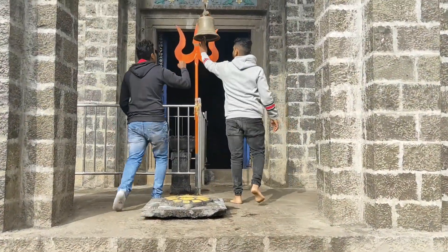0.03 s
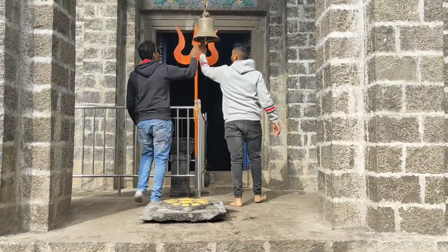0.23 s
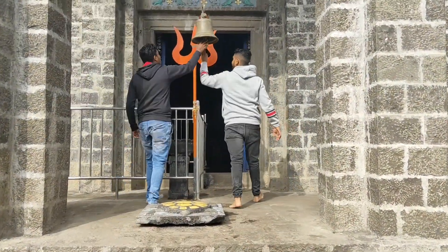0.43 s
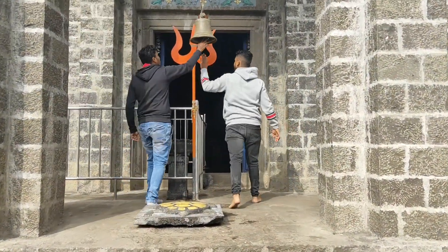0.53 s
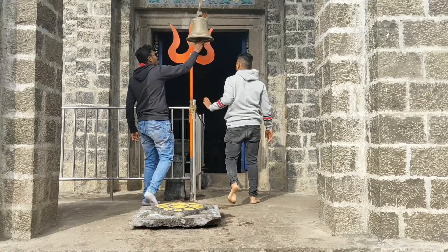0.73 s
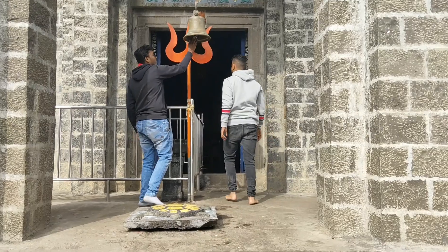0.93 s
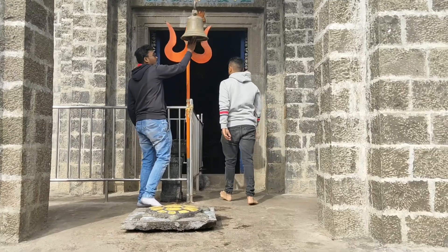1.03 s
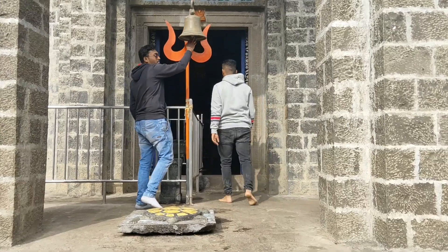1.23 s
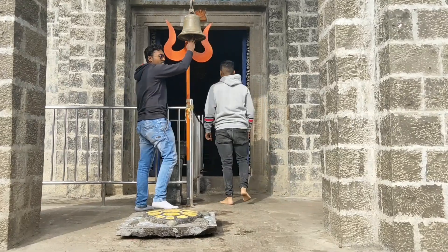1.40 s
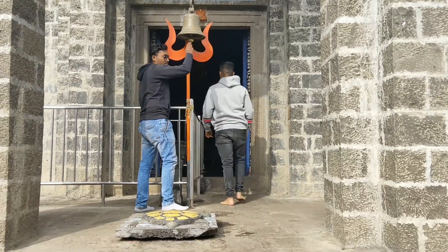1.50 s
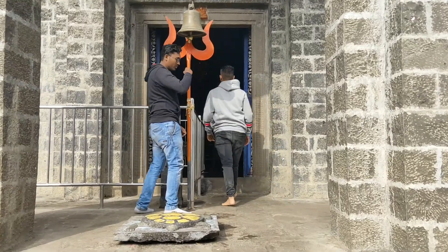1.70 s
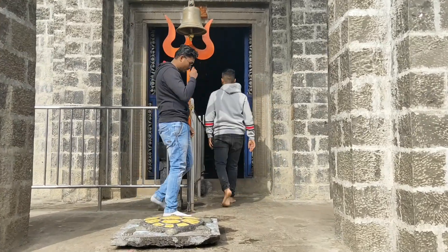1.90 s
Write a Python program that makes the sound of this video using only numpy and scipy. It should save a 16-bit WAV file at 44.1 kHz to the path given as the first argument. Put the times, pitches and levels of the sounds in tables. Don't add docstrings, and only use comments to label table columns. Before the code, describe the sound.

Two clanging blows on a hanging brass bell ring on in a stone doorway; loose metal rattles afterwards.

```python
import sys
import numpy as np
from scipy import signal
from scipy.io import wavfile
from scipy.ndimage import uniform_filter1d, minimum_filter1d

SR = 44100
rng = np.random.default_rng(int(sys.argv[2]) if len(sys.argv) > 2 else 0)


def voltage_ratio(decibels):
    exponent = np.asarray(decibels, float) / 20
    return 10 ** exponent


def digitize_waveform(pressure):
    field = np.atleast_2d(pressure).T
    bounded = np.clip(field, -1, 1)
    quanta = np.round(bounded * 32767).astype(np.int16)
    wavfile.write(sys.argv[1], SR, quanta)


N = 85995

BLOW_S = [
    .2228,
    1.0838,
]
# (frequency [Hz], left-right [dB])
RATTLE_PAN = [(1000, -5.5), (2800, 8.5), (4300, 10), (5500, 12), (6500, -9)]


def rms_one(x):
    return x / np.sqrt(np.mean(x ** 2) + 1e-20)


def in_time(rows):
    s, *columns = np.transpose(rows)
    return [np.interp(np.arange(N) / SR, s, c) for c in columns]


def at_hz(points, hz):
    point_hz, values = np.transpose(points)
    return np.interp(np.log(hz), np.log(point_hz), values)


def drift(rate_per_s):
    r = np.exp(-80 * np.pi * rate_per_s / SR)
    white = rng.standard_normal(N // 40 + 2002)
    slow = signal.lfilter([1], [1, -2 * r, r * r], white)[2000:]
    return np.interp(np.arange(N) / 40, np.arange(len(slow)), rms_one(slow))


def ring(force, hz, t60_s):
    pole = voltage_ratio(-60 / (t60_s * SR)) * np.exp(2j * np.pi * hz / SR)
    return signal.lfilter([1], [1, -pole], force + 1e-18)


def ports(z, lead_rad, pan_db):
    turn = np.exp(.5j * lead_rad)
    return np.array([(z * turn).imag * voltage_ratio(pan_db / 2), (z / turn).imag * voltage_ratio(-pan_db / 2)])


def bands(white, spectrum, shape):
    low_end_hz, high_end_hz = spectrum[0][0], spectrum[-1][0]
    out, edges_hz = 0, 20 * 2 ** np.arange(0, 10, .5)
    for low, high in zip(edges_hz, np.append(edges_hz[1:], 17000)):
        hz = np.sqrt(low * high)
        if low_end_hz * .8 < hz < high_end_hz * 1.1:
            sos = signal.butter(3, [low, high], "band", fs=SR, output="sos")
            out = out + voltage_ratio(at_hz(spectrum, hz)) * shape(hz) * signal.sosfilt(sos, white)
    power = [voltage_ratio(at_hz(spectrum, hz)) ** 2 for hz in np.linspace(low_end_hz, high_end_hz, num=400)]
    return out / np.sqrt(np.mean(power) * high_end_hz * 2 / SR)


def stereo_noise():
    alike = .6
    mid, side = rng.standard_normal((2, N))
    return (np.sqrt(1 + alike) * mid + np.sqrt(1 - alike) * side * [[1], [-1]]) / np.sqrt(2)


def wind():
    # (time [s], level [dB], left-right [dB])
    gust = [(0.0, -73.5, -1), (0.286, -70, 8), (0.396, -23.5, 37), (0.422, -42.5, 10.5), (0.656, -30, 24.5),
            (0.754, -50, 0), (0.988, -46, 10.5), (1.02, -34, -35), (1.074, -51.5, 3), (1.248, -41.5, 12.5),
            (1.682, -48.5, -11.5), (1.818, -40, 13), (1.95, -69, -10)]
    # (frequency [Hz], density [dB per Hz])
    colour = [(12, -57), (20, -30), (87, 5.5), (140, 2.5), (225, -7), (283, -11), (420, -27), (550, -47.5),
              (920, -120)]
    db, pan_db = in_time(gust)
    share = voltage_ratio(np.array([pan_db, -pan_db]) / 2)
    share = share / np.sqrt(np.sum(share ** 2, axis=0))
    lumps = bands(rng.standard_normal((2, N)), colour, lambda hz: voltage_ratio(6.86 * drift(11.5)))
    return lumps * voltage_ratio(db + 2.0) * share


def touch():
    # (frequency [Hz], level [dB], t60 [s])
    modes = [(352, -76, 0.052), (1425, -82, 0.037), (2750, -80, .03), (3300, -102, 0.036),
             (5950, -112, .04)]
    start_s, rise_s, length_s = .138, .014, .06
    since = np.arange(N) / SR - start_s
    envelope = np.clip(since / rise_s, 0, 1) * np.exp(-np.maximum(since, 0) / length_s)
    rub = rng.standard_normal(N) * envelope
    return sum(voltage_ratio(db) * ring(rub, hz, t60_s).imag for hz, db, t60_s in modes)


def partial(hz, levels_db, t60_s, swell_s):
    out = np.zeros((2, N), complex)
    for row, s, db in zip(range(2), BLOW_S, levels_db):
        start = int(s * SR)
        since = np.arange(min(N - start, int(1.5 * t60_s * SR))) / SR
        decaying = np.exp((2j * np.pi * hz - np.log(1000) / t60_s) * since)
        out[row, start:][:len(since)] = voltage_ratio(db) * (1 - np.exp(-since / swell_s)) * decaying
    return out


def named_partials():
    rim_hz = [467.5, 468.97, 1015.79, 1016.28, 1055.79, 1058.61, 1450.31, 1452.02, 1493.64, 1495.23,
              2173.96, 2174.52, 2177.49, 2183.35]
    waist_hz = [2509.76, 2555.31, 2855.1, 2855.27, 2887.34, 2891.36, 3036.29, 3039.22, 3047.02, 3105.5,
                3550.52, 4046.81, 4051.18, 4207.74]
    shoulder_hz = [4208.49, 4253.2, 4524.49, 4537.9, 5194.11, 5194.65, 5198.19, 5407.64, 5830.5, 6232.5,
                   6237.87, 6473.9, 6453.13, 6691.5]
    # (first blow [dB], second blow [dB], t60 [s], left-right
    # [dB], left port's lead [rad])
    partials = [(-35.5, -48.5, 17.3, 0.8, 0.84), (-42.5, -36.5, 27, -1.5, 0.12), (-24, -26.5, 4.34, -13.5, 6.5),
                (-19, -50, 1.82, -7, 0.36), (-34.5, -31.5, 5.2, -5, 0.8), (-19, -29.5, 5.98, -5.5, -6),
                (-21, -31.5, 2.64, 1.5, -3.5), (-30.5, -18.5, 1.72, 13, 3.5), (-31.5, -25, 1.94, 6, 3.5),
                (-26, -29.5, 4.3, -10, -3), (-19, -21.5, 2.1, 4.5, 1.32), (-18.5, -36.21, 1.28, -17.5, -2.5),
                (-17, -17.5, 0.88, 4.5, 6), (-72.5, -18.05, 0.82, -3, 6),
                (-29, -29, 0.64, 8, -0.4), (-45.5, -32.5, 1, 0.5, 5.5), (-6, -12, 0.15, 5, 4.5),
             (-11, -20.5, 0.6, 3.5, -2.2), (-36.5, -34, 1.7, 9, 3.5), (-22.5, -22, 0.53, 15.5, 0.3),
             (-16, -42.5, 1.14, 7.5, -2.5), (-16, -16.5, 0.72, 17.5, -0.13), (-16.5, -54.5, 0.45, -2, 3),
             (-30, -35.5, 1.04, 5, 6.5), (-38.5, -43.5, 0.77, 1, 1), (-28.5, -34.05, 0.72, 7, 1.1),
             (-39, -30, 0.48, 3.5, 3.5), (-25, -30.5, 0.58, 4.5, -1.5),
                (-24.52, -37, 0.17, 13.5, -6), (-35.5, -46, 0.94, 6, 2.04), (-42, -60, 0.95, -16.5, -5),
                (-29, -42.5, 0.72, -1, 2), (-9.5, -14, 0.42, -10, 2), (-5.5, -10.5, 0.29, -5, -4.5),
                (-19.5, -28, 0.53, -2.31, 1.5), (-37, -38.5, 0.49, -2, -3.5), (-29.5, -31.5, 0.38, -6, 0.1),
                (-24, -32.5, 0.5, -5, -1.3), (-37, -39.5, 0.73, -23, -2), (-36.5, -26.5, 0.43, 24.0, 4),
                (-19, -28, 0.55, -5, -0.1), (-32.5, -45, 0.95, 7.5, 3.4)]
    rim_turned = [23.5, -2, -9, -20.5, -1, -6, -5, -9.19, -15, -13, 1.5, 12, 7.5, 4]
    waist_turned = [0, 3.1, 4, 3.5, 11, 5.5, 22, 7.5, -1, 18, -3, 4, -9, 12.5]
    shoulder_turned = [4, 2.5, 20, 13.5, -3.5, -2, 8, 0, -4, -9, 12, -2, -5, -2]
    swell_at_1khz_s = .029
    sway_db_per_khz, sway_per_s = .6, 7
    out, sway, below_hz = np.zeros((2, N)), 1, 0
    rows = zip(rim_hz + waist_hz + shoulder_hz, partials,
               rim_turned + waist_turned + shoulder_turned)
    for hz, (first_db, second_db, t60_s, pan_db, lead_rad), turned_db in rows:
        first, second = partial(hz, [first_db, second_db], t60_s, swell_at_1khz_s * 1000 / hz)
        if abs(hz - below_hz) >= 5:
            depth_db = sway_db_per_khz * max(hz - 1500, 0) / 1000
            sway = voltage_ratio([depth_db * drift(sway_per_s) for side in range(2)])
        below_hz = hz
        out += (ports(first, lead_rad, pan_db) + ports(second, lead_rad, turned_db)) * sway
    return out


def flickering(hz, levels_db, cycles):
    flicker = voltage_ratio([5.5 * drift(12) for side in range(2)])
    z = sum(partial(hz, levels_db, cycles / hz, 0.0081))
    return ports(z, rng.uniform(-4.5, 2.7), rng.normal(0, 4.5)) * flicker


def crown():
    crown_hz = [6883, 6969, 7048, 7219, 7350, 7714, 7848, 8163, 8241, 8415, 8930, 9028, 9320, 9777, 10125,
                10541, 10870, 11270, 12342, 12500, 12755, 13170, 13530, 13861, 14168, 14425, 14655]
    # (first blow [dB], second blow [dB])
    levels = [(-45, -54.5), (-39.5, -44.5), (-41, -44.5), (-38, -63), (-49, -59.5), (-41.5, -47),
              (-41, -56.5), (-47, -65), (-51, -69), (-43, -49), (-54, -63), (-44.5, -54), (-44.5, -50.5),
              (-50, -62), (-43.5, -58.5), (-55, -70), (-61, -56.5), (-62, -56.5), (-66, -58.5),
              (-51.5, -69), (-60.5, -65.5), (-62, -64), (-68, -74), (-69.5, -70), (-66, -84), (-64, -79),
              (-66, -79)]
    out = np.zeros((2, N))
    for hz, db in zip(crown_hz, levels):
        lift_db = 6.5 if hz > 11000 else 0
        out += flickering(hz, np.array(db) + lift_db, 4740)
    return out


def weak_partials():
    # (frequency [Hz], level [dB])
    spectrum = [(1500, -53), (2500, 5.5), (3600, -12.5), (5000, -8.5), (6500, 5.5), (8000, -18.5),
                (11000, -17), (15800, -19)]
    level_db, second_db, usual_cycles = -46.5, -9, 4040
    out = np.zeros((2, N))
    for u, a, b in rng.random((70, 3)):
        hz = 2300 + 5200 * u
        db = level_db + at_hz(spectrum, hz) + 10 * a
        cycles = usual_cycles * (.5 + rng.random())
        out += flickering(hz, [db, db + second_db + 12 * (b - .5)], cycles)
    return out


def clank():
    # (frequency [Hz], density [dB per Hz])
    colour = [(150, -11), (700, -9.5), (1500, -1.5), (3000, -4), (4300, -5), (6500, -8.5), (8000, -31.5),
              (15800, -47.5)]
    blow_db = [-22.5, -24.5]
    # (frequency [Hz], t60 [s])
    decay = [(300, .3), (2000, .2), (7000, .2), (9000, .06), (15000, .05)]
    t = np.arange(N) / SR

    def dying(hz):
        t60_s = at_hz(decay, hz)
        return sum(voltage_ratio(db - 60 * (t - s) / t60_s) * (t > s) for s, db in zip(BLOW_S, blow_db))

    return bands(stereo_noise(), colour, dying)


def bell():
    return named_partials() + crown() + weak_partials() + clank()


def scuff():
    # (time [s], level [dB])
    level = [
        (0, -110),
        (.2, -100),
        (.24, -44.5),
        (.6, -56),
        (.85, -59),
        (.98, -47),
        (1.06, -47.5),
        (1.15, -47),
        (1.5, -66.5),
        (1.95, -49),
    ]
    # (frequency [Hz], density [dB per Hz])
    colour = [(300, 6.5), (700, 2), (1800, 4.5), (3000, -2.5), (4500, -8), (6500, -3), (8500, -16),
              (12000, -57.5)]
    level_db, = in_time(level)
    return bands(stereo_noise(), colour, lambda hz: voltage_ratio(level_db + 0.98 * drift(36.0)))


def rattle(on, late_s, knocks):
    # (frequency [Hz], density [dB per Hz])
    colour = [(300, -12.5), (1100, -3), (2000, 3), (3100, 1.5), (4300, 0), (6500, 1.5), (7600, -30),
              (8300, -21.5)]
    dulling_db_per_s = 48

    def shape(hz):
        sides = voltage_ratio(0.27 * at_hz(RATTLE_PAN, hz) * np.array([[1], [-1]]))
        return on * sides * voltage_ratio(-dulling_db_per_s * late_s * hz / 8000)

    return bands(stereo_noise() + 0.5 * rms_one(knocks), colour, shape)


def shaken(on):
    rattled_hz = [1071, 2094, 2558, 3052, 3208, 4048, 5410, 6191, 6578, 7230, 8102, 9130]
    # (level [dB], t60 [s])
    shaken_modes = [(-9.5, 1), (-9.5, .4), (-6.5, 0.69), (-5.5, 0.48), (-4.5, 0.17), (-10.5, 0.3),
                    (-21, 0.34), (-1.5, 0.23), (5, 0.24), (-3, 0.064), (-16.5, 0.047), (-14.5, 0.063),
                    (-5.5, 0.5), (-8, 0.38), (-8, 0.28), (-21.5, 0.2), (-18.5, 0.4), (-7, 0.46),
                   (-5.5, 0.21), (-24, 0.1), (-16, 0.15), (-10, 0.27), (-14, 0.27), (-12, 0.31),
                   (-12, 0.16), (-4, 0.077)]
    more_hz = [1453, 2178, 2198, 2762, 2808, 2858, 2994, 3549, 3912, 4259, 5206, 5710, 5943, 6818]
    lift_db, top_db = 1, -27
    out = np.zeros((2, N))
    for hz, (db, t60_s) in zip(rattled_hz + more_hz, shaken_modes):
        z = ring(on ** 2 / on.max() * rng.standard_normal(N), hz, t60_s)
        level_db = min(db + lift_db, 0) + top_db + 1.73 * drift(31.0)
        out += ports(z, rng.normal(0, 1), at_hz(RATTLE_PAN, hz)) * voltage_ratio(level_db)
    return out


def jingle(on, knocks):
    level_db, db_per_khz, cycles = -45, -3.6, 1100
    shake = on ** 3 / on.max() ** 2 * knocks
    out = np.zeros((2, N))
    for u, a, b in rng.random((36, 3)):
        hz = 7600 + 8000 * u
        z = ring(shake, hz, cycles / hz * (.5 + a))
        db = level_db + db_per_khz * (hz - 7600) / 1000 + 10 * b
        out += ports(z, 3.6 * (a - b), 10 * (b - .5)) * voltage_ratio(db)
    return out


def third_blow():
    # (time [s], level [dB])
    clatter = [
        (1.562, -104),
        (1.582, -30),
        (1.605, -19.5),
        (1.64, -22.5),
        (1.7, -25.5),
        (1.8, -32.5),
        (1.95, -46.5),
    ]
    knocks_per_s = 3100
    level_db, = in_time(clatter)
    late_s = np.maximum(np.arange(N) / SR - clatter[2][0], 0)
    on = voltage_ratio(level_db) * (np.arange(N) > clatter[0][0] * SR)
    hits = rng.random(N) < knocks_per_s / SR
    strength = voltage_ratio(5.9 * np.minimum(rng.exponential(1, N), 5))
    knocks = hits * strength * rng.choice([-1, 1], N)
    return rattle(on, late_s, knocks) + shaken(on) + jingle(on, knocks)


def scene():
    return wind() + touch() + bell() + scuff() + third_blow()


def low_pass(x):
    return signal.sosfilt(signal.butter(12, 15800, fs=SR, output="sos"), x)


def record(dry):
    # (time [s], gain [dB])
    gain = [(.22, 4), (.26, 4), (.33, -0.5), (.7, 0.5), (1.08, -3), (1.1, 6), (1.3, 0), (1.57, 2.5),
            (1.62, -4.5), (1.75, -7), (1.95, -0.5)]
    ceiling_db, release_db_per_s = -2.2, 60
    gain_db, = in_time(gain)
    x = dry * voltage_ratio(gain_db)
    over_db = np.maximum(20 * np.log10(abs(x).max(axis=0) + 1e-9) - ceiling_db, 0)
    ramp_db = release_db_per_s * np.arange(N) / SR
    held_db = -minimum_filter1d(ramp_db - np.maximum.accumulate(over_db + ramp_db), size=129)
    x = x * voltage_ratio(-uniform_filter1d(held_db, size=129))
    top_cut = signal.cheby2(12, 70, 16100, fs=SR, output="sos")
    return low_pass(signal.sosfilt(top_cut, x))


dry = scene()
out = record(dry)
digitize_waveform(out)
```